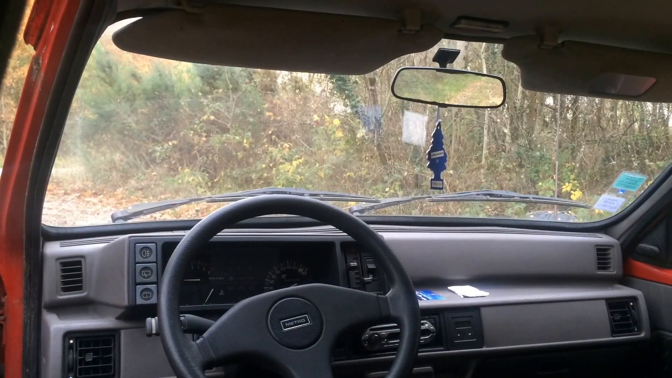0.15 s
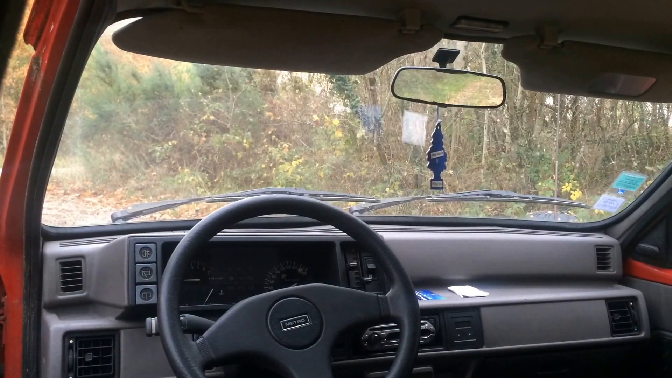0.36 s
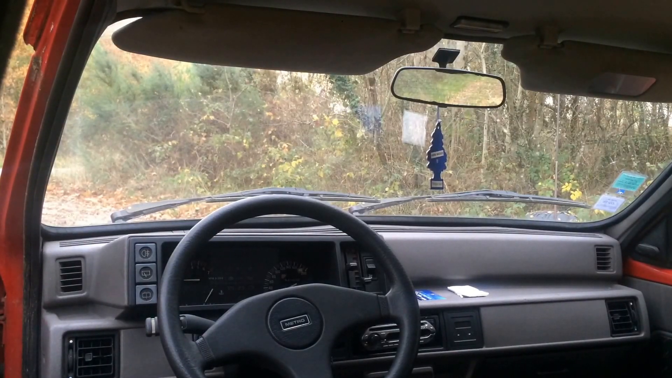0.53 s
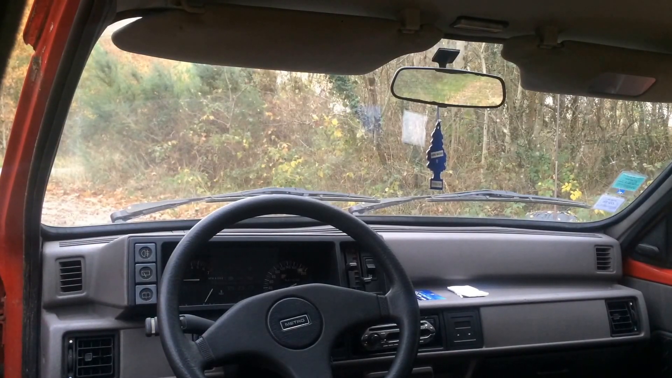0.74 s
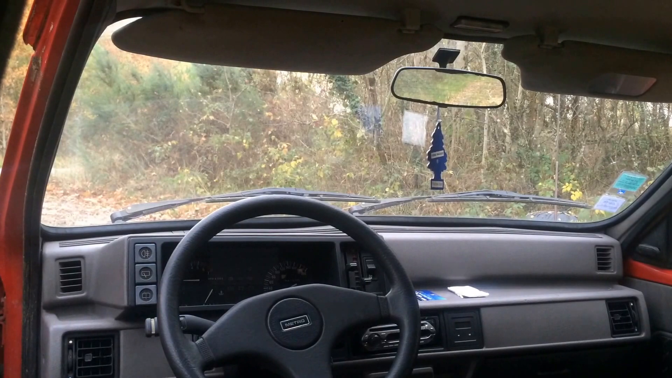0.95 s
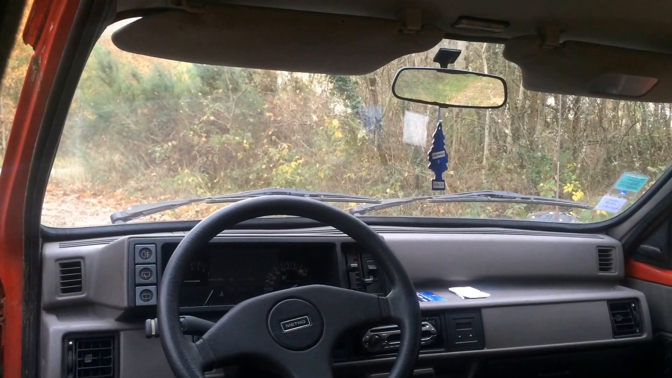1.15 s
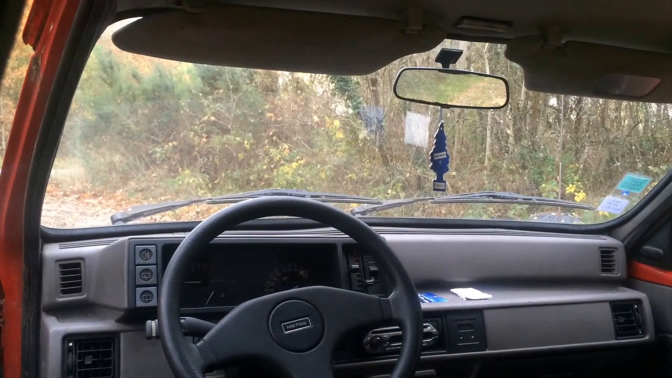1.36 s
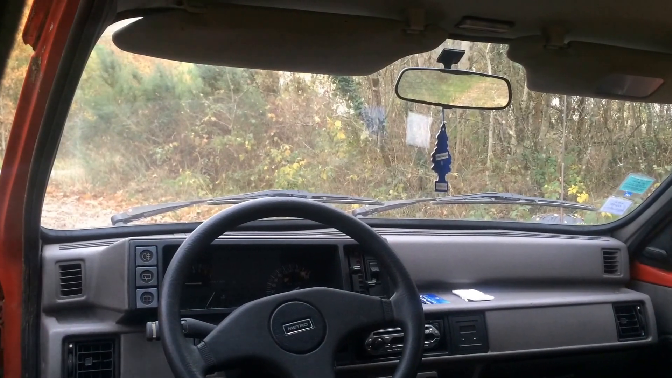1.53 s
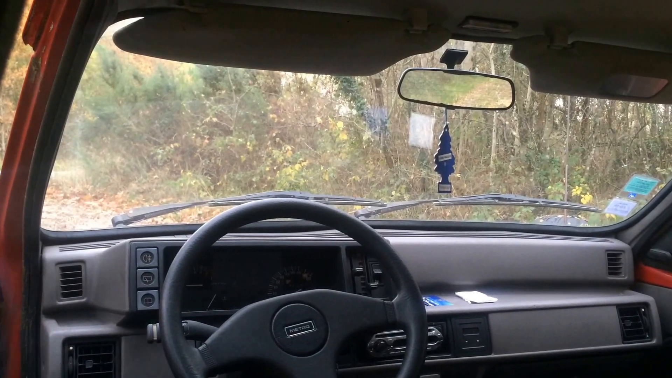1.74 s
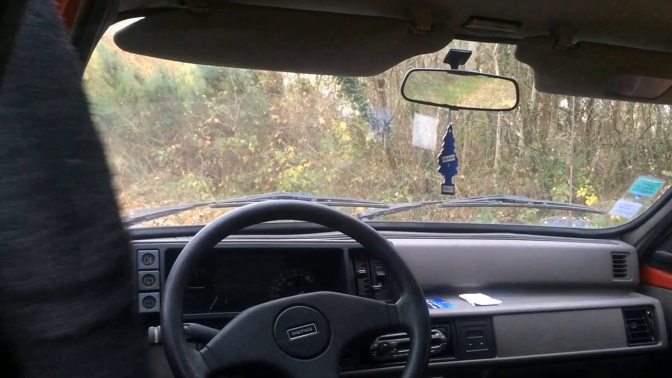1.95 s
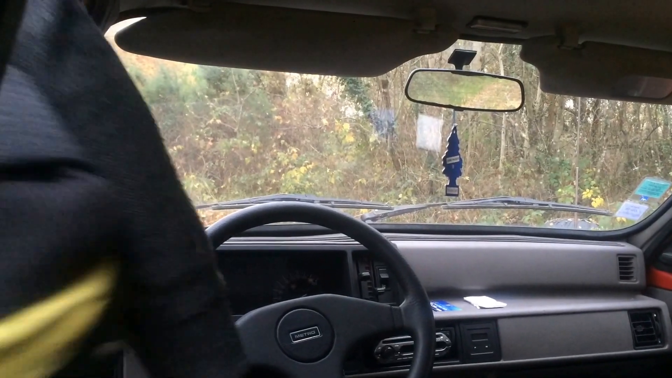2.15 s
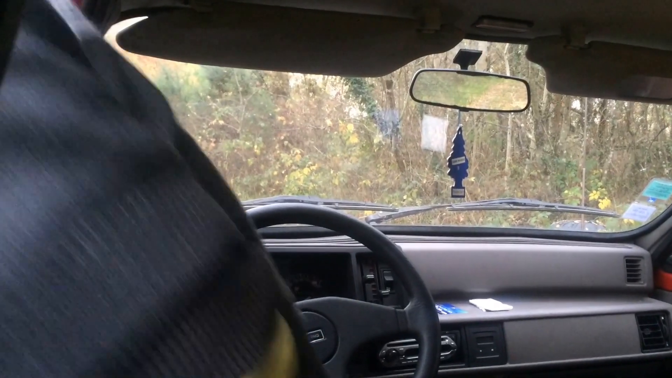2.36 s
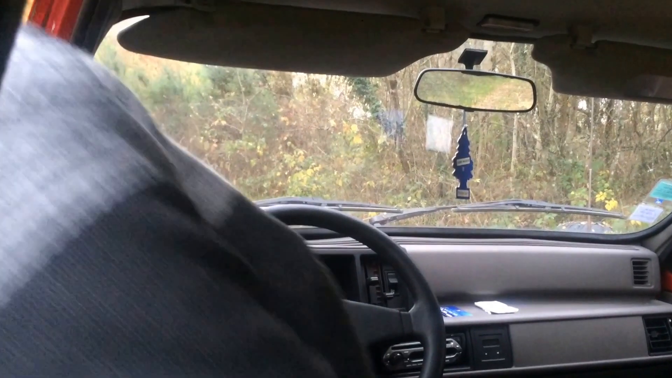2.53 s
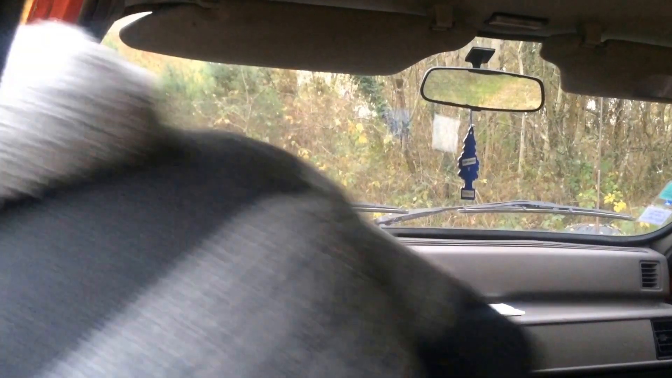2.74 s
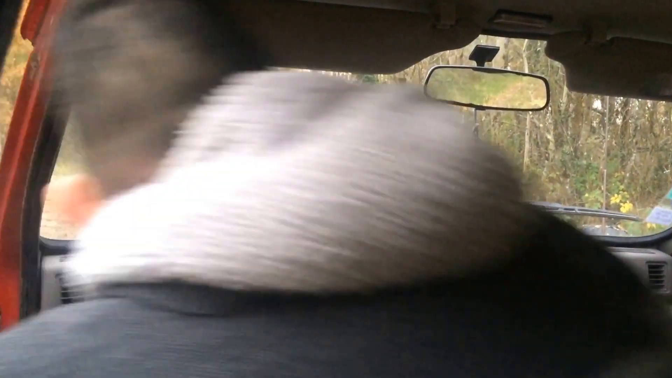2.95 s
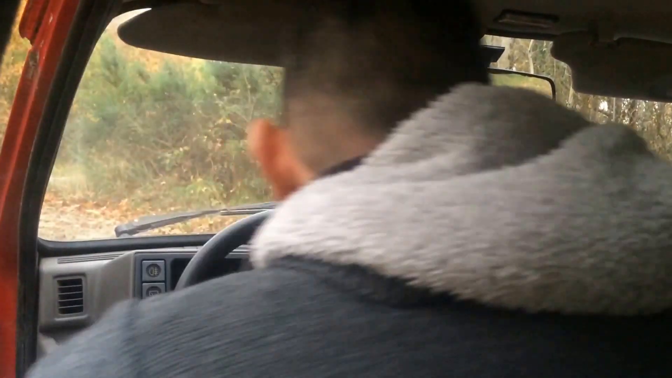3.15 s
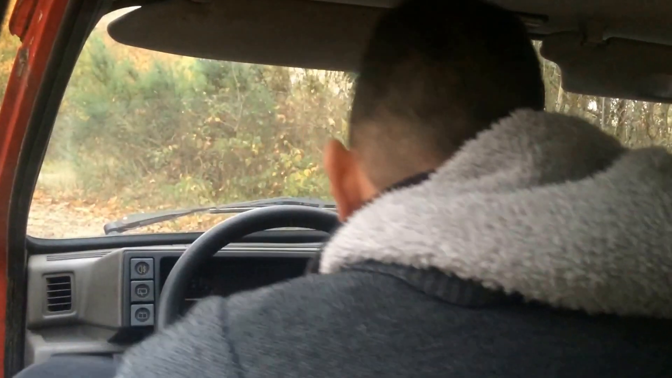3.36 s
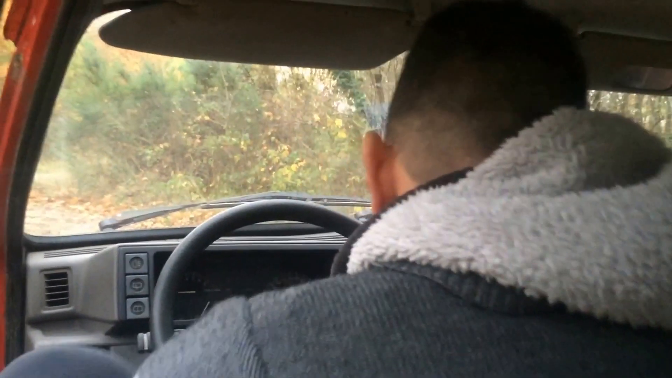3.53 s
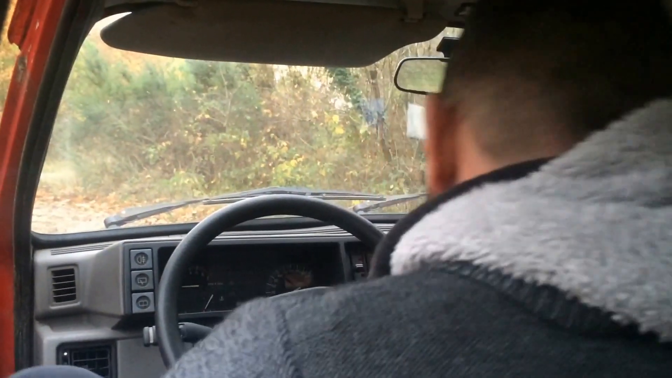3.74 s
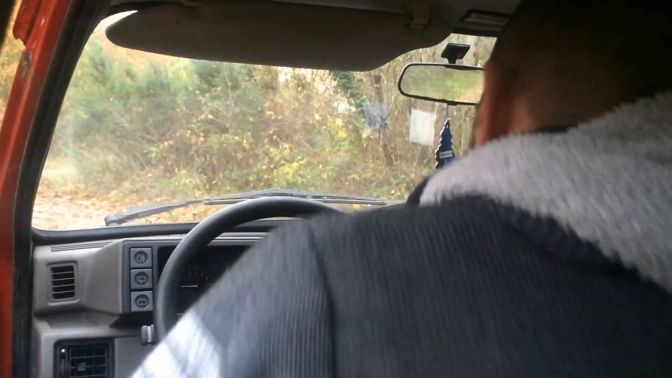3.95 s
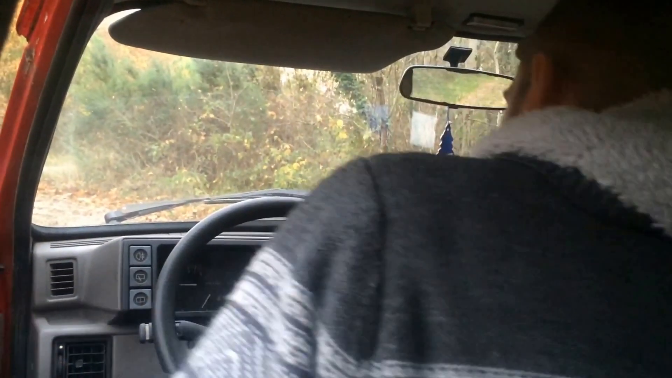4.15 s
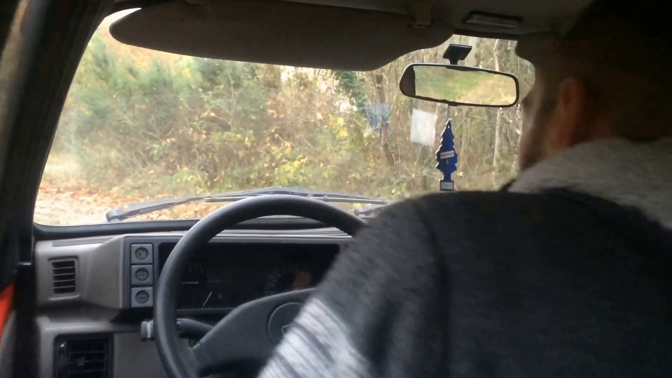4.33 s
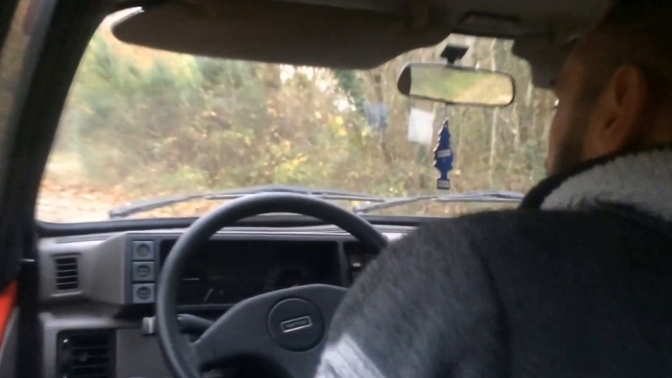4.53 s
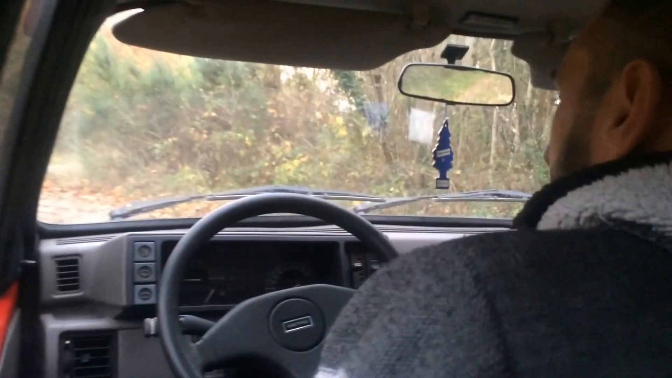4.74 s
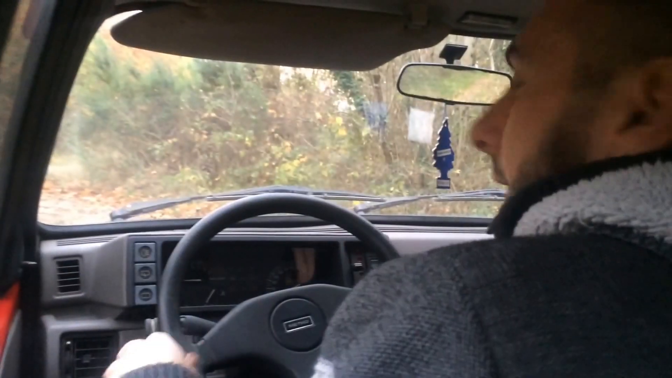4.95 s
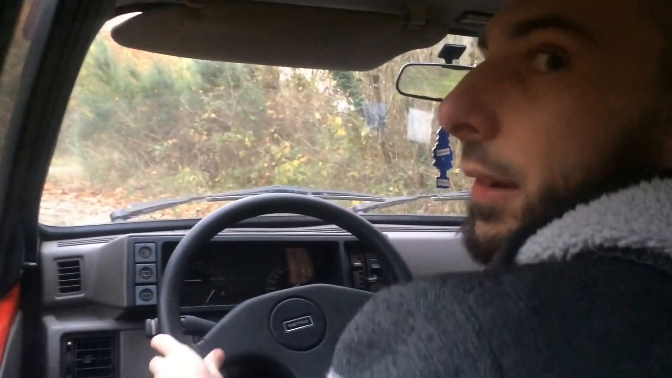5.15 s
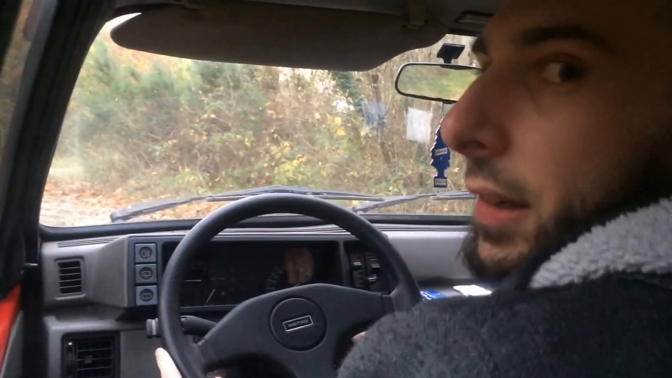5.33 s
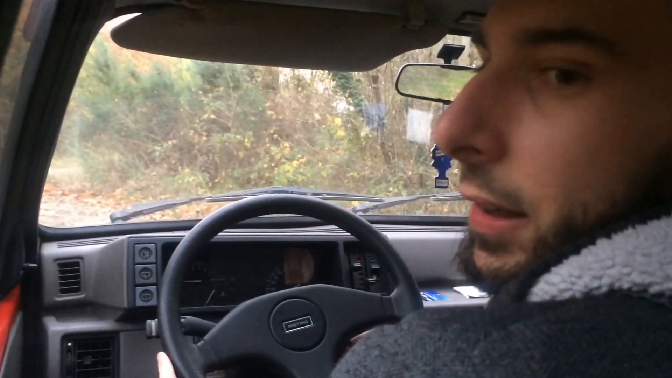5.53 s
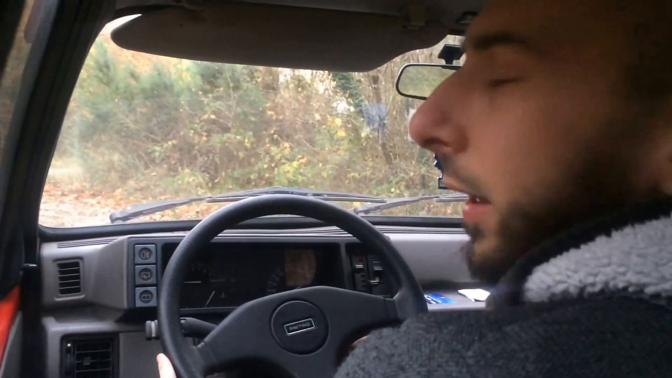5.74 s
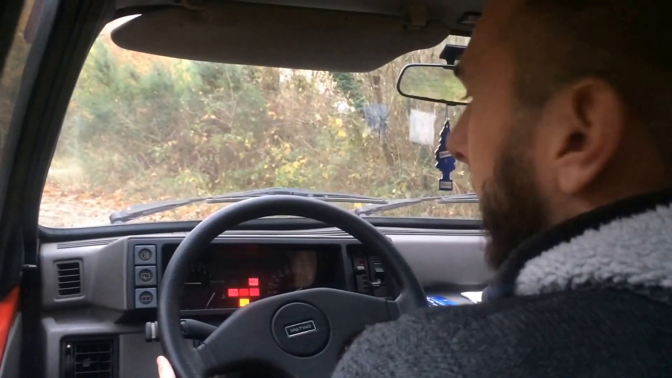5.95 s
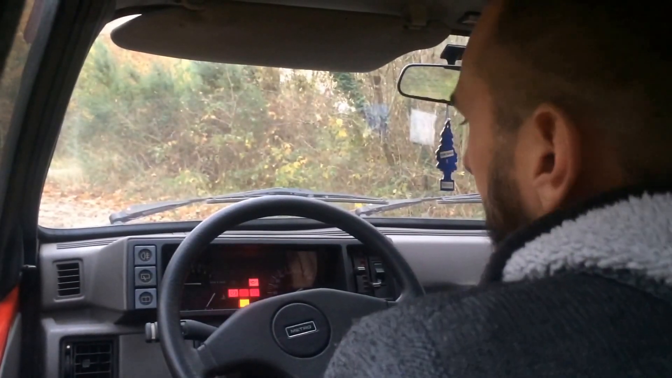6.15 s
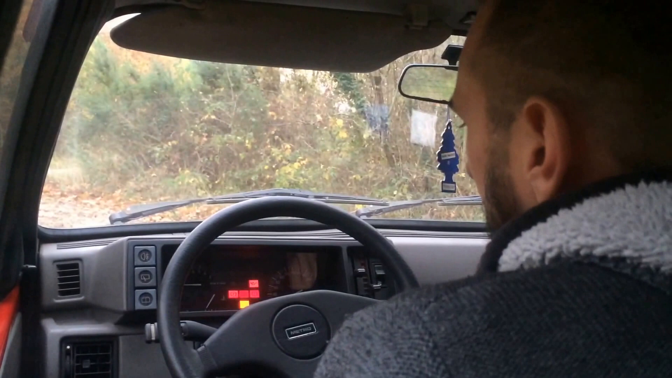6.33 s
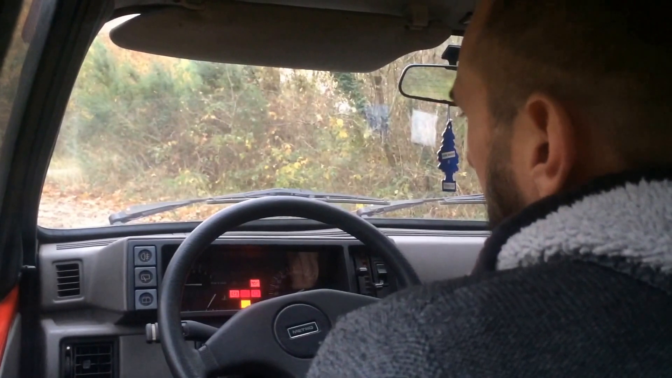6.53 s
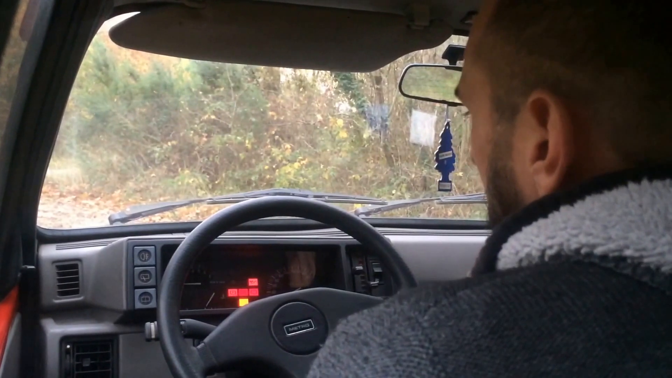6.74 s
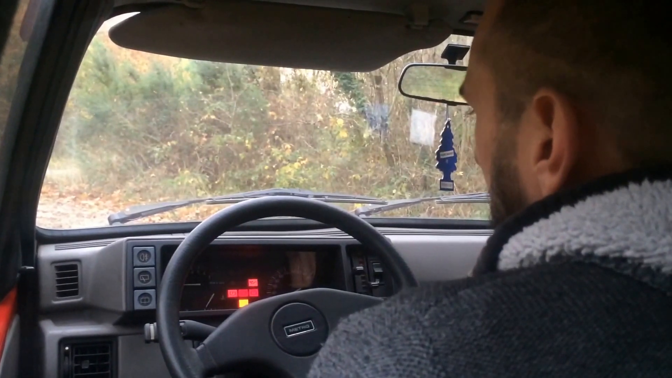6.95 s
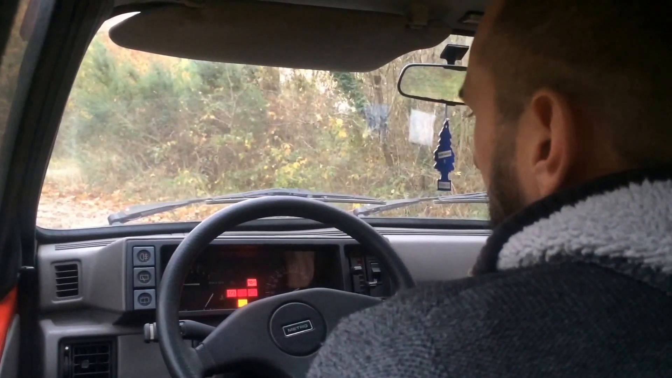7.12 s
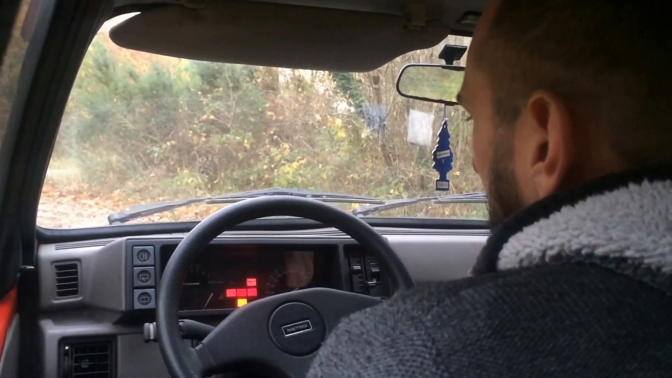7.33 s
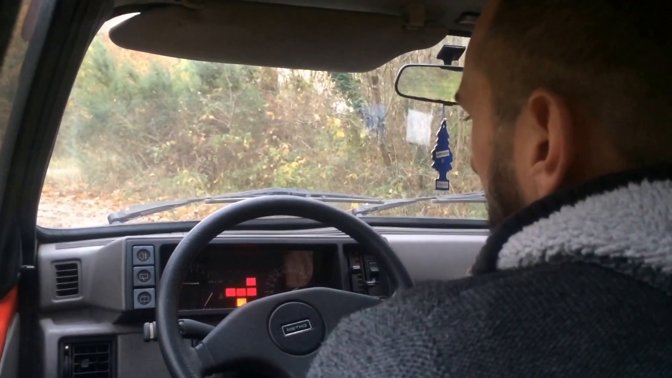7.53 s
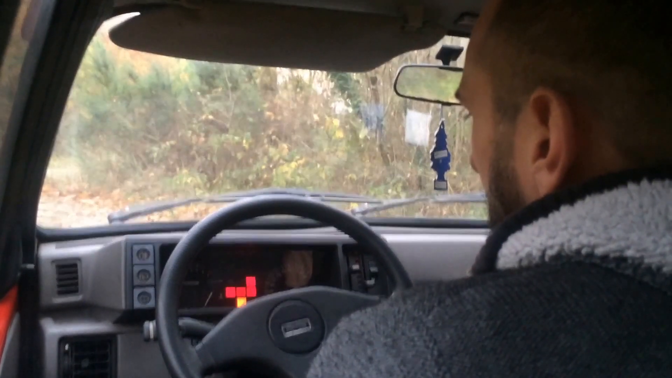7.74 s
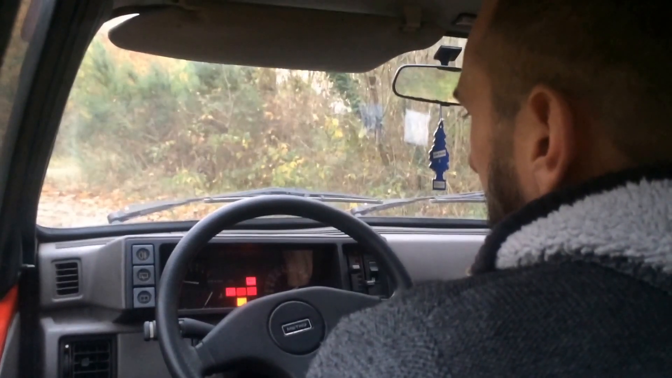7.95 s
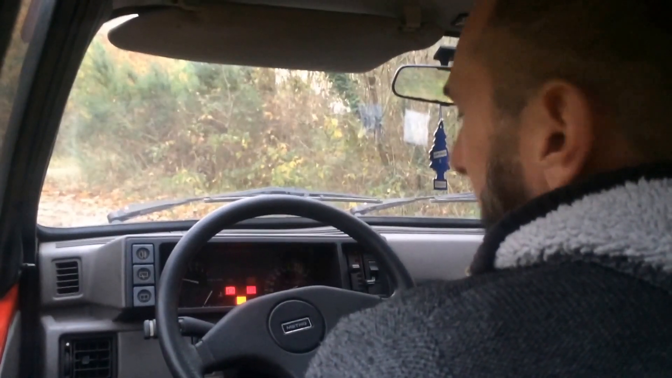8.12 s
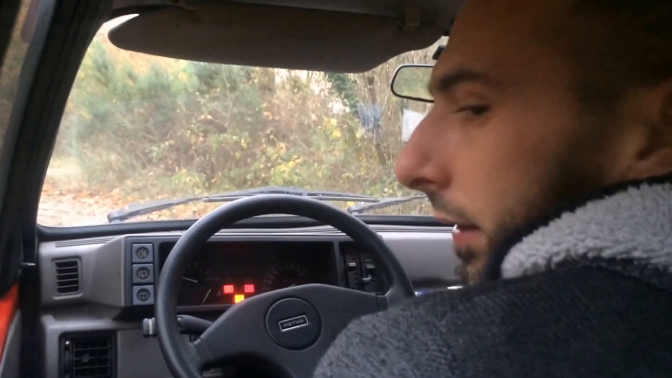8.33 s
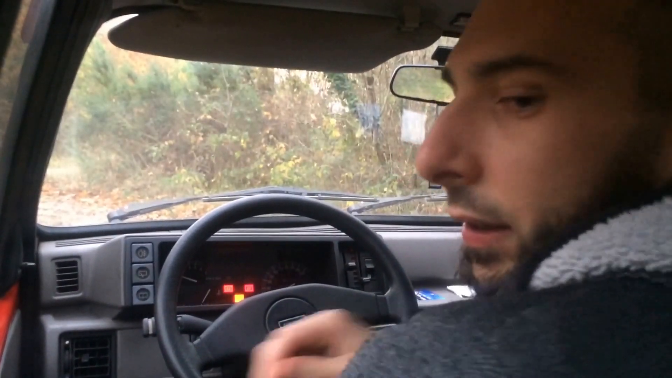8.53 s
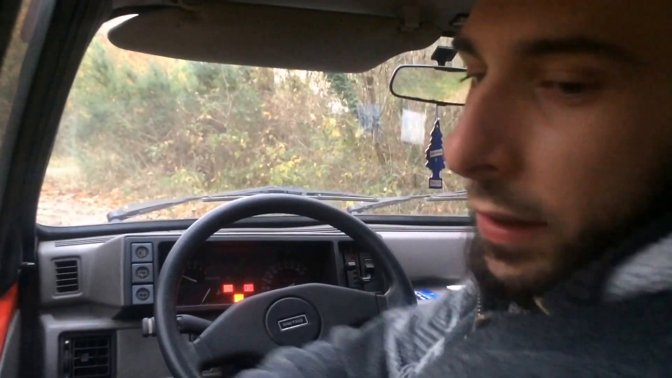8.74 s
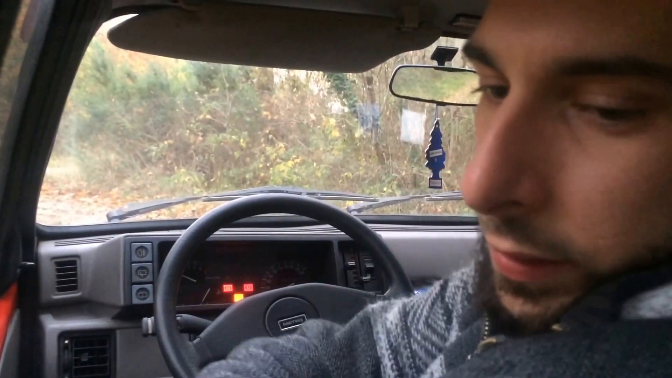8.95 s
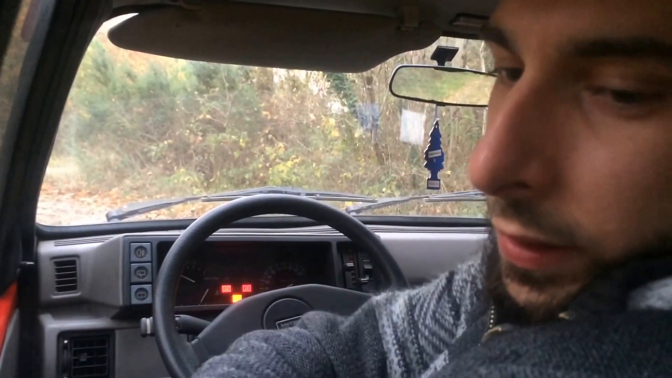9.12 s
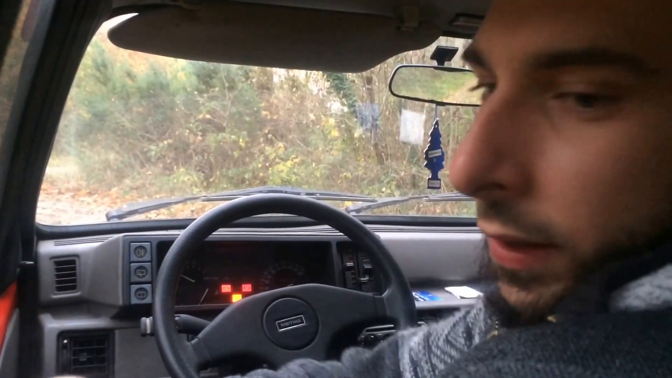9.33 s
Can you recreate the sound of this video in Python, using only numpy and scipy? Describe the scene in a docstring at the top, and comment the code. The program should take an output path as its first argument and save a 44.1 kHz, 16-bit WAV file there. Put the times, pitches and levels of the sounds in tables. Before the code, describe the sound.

Close inside a small old car parked by woodland. Faint hush and cloth rustle, then a dull thump as someone climbs in, seat creaks, another heavy thump, and a very loud door slam with a rattling tail. Small key and lever clicks and clunks follow. A brief starter grind turns into a falling whine as the four-cylinder engine catches, rumbling and rising in pitch.

```python
"""A small car heard from inside: someone climbs in, the seat thumps, the door slams and rattles, the engine starts.
Blows are short low notes that set body panels ringing; keys, latches and levers are bursts of tiny impacts.
The starter grinds and its whine runs down in pitch; the four-cylinder engine catches and climbs in pitch,
built from waves locked to its firing rate plus clatter, rumble and hiss.
Shaped noise makes the cloth rustle, the body sway, the seat creak and the quiet outdoor hush."""
import sys
import numpy as np
from scipy import signal
from scipy.fft import rfft, irfft
from scipy.io import wavfile
from scipy.ndimage import uniform_filter1d

SR = 44100
rng = np.random.default_rng(int(sys.argv[2]) if len(sys.argv) > 2 else 0)


def put_to_file(sound):
    """Save the sound as 16-bit audio at rate SR, in the file named by the first command-line argument."""
    columns = np.atleast_2d(sound).T  # one column per channel
    safe = np.clip(columns, -1, 1)
    whole_steps = np.round(safe * 32767)
    wavfile.write(sys.argv[1], SR, whole_steps.astype(np.int16))


N = 413658
TIME = np.arange(N) / SR


def undb(db):
    """Turn decibels into a plain multiplier."""
    return 10 ** (np.asarray(db) / 20)


def unit(x):
    """Scale to an average (RMS) level of 1."""
    return x / np.sqrt(np.mean(x ** 2))


def curves(table):
    """Draw each column over time; also return a gate that fades to zero 20 ms outside the table."""
    s, *columns = np.transpose(table)
    gate = np.clip(np.minimum(TIME - s[0] + .02, s[-1] + .02 - TIME) / .02, 0, 1)
    return [np.interp(TIME, s, column) for column in columns], gate


def walk(rate):
    """Wander at random: levels held for 1 / rate seconds, smoothed twice, with a spread near 1."""
    held = int(SR / rate)
    steps = np.repeat(rng.standard_normal(N // held + 1), held)
    return 1.3 * uniform_filter1d(uniform_filter1d(steps, held), held)[:N]


def coloured(spectrum, flicker_db=0., rate=10.):
    """Make noise with the given (hz, db) spectrum; each octave flickers on its own."""
    hz = np.maximum(np.arange(N // 2 + 1) * SR / N, 1)
    f, db = np.transpose(spectrum)
    shape_db = np.interp(np.log(hz), np.log(f), db, left=-90, right=-90)
    full = rfft(rng.standard_normal(N)) * undb(shape_db)
    octave = np.floor(np.log2(hz / 30)).clip(0, 8)
    return unit(sum(irfft(full * (octave == k), N) * undb(flicker_db * walk(rate)) for k in range(9)))


def band(lo_hz, hi_hz):
    """Spectrum of a soft-edged band of noise."""
    return [(lo_hz / 2, -24), (lo_hz, 0), (hi_hz, -6), (2 * hi_hz, -30)]


def resonate(x, hz, width):
    """Let one resonance ring; a narrow width in Hz rings longer."""
    b, a = signal.iirpeak(hz, hz / width, SR)
    return signal.lfilter(b, a, x)


def body(x, peaks):
    """Ring all of an object's resonances, with alternating sign."""
    return sum((-1) ** k * undb(db) * resonate(x, f, w) for k, (f, w, db) in enumerate(peaks))


def add(out, s, x, db):
    """Place a short sound at s seconds, scaled to the given peak."""
    i = int(s * SR)
    out[i:i + len(x)] += (x * undb(db) / np.abs(x).max())[:N - i]


def decay(t, t60, rise):
    """Rise smoothly, then fade; t60 is the time to fade by 60 dB."""
    return (1 - np.exp(-t / rise)) * np.exp(-np.log(1000) * t / t60)


# colour of the outdoor hush: hz, level_db (per Hz)
HUSH_COLOUR = [(20, -22), (40, 0), (60, -16.5), (500, -27), (1000, -23.5), (2000, -39), (15500, -53)]
HUSH_DB = -67.5


def hush():
    """Steady quiet outdoor noise whose octaves drift slowly."""
    return undb(HUSH_DB) * coloured(HUSH_COLOUR, 1.1, 0.93)


# body sway and seat creak, including the low sway after the door slam: time_s, sway_db, creak_db
SWAY_AND_CREAK = [(0, -70.5, -67.5), (2.15, -69, -66), (2.5, -62, -66.5), (2.9, -43, -53),
                  (3.15, -52, -55.5), (3.4, -52, -53.5), (3.84, -59, -58), (4.1, -51, -53), (4.4, -62, -60),
                  (4.62, -37, -59.5), (4.9, -51.5, -60), (5.4, -56.5, -57), (5.75, -61, -67.5),
                  (5.91, -60.5, -55), (6.4, -59.5, -65.5), (6.78, -50, -50), (7.0, -55.5, -61.5),
                  (7.25, -60, -74), (7.5, -61.5, -71.5)]
# the steady stir under the rustles: time_s, level_db
STIR = [(0, -71.5), (4.4, -68), (4.6, -73.5), (6.9, -75), (7.6, -78), (9.38, -83)]
# cloth sliding and leaves stirring: start_s, held_s, level_db
RUSTLES = [(.05, 0.18, -62.5), (.8, 0.14, -69), (1.161, 0.049, -57), (1.28, 0.096, -60.5),
           (1.42, 0.063, -55.5), (2.36, 0.13, -58.5), (3.0, 0.18, -65.5), (3.34, .08, -63),
           (4.0, 0.19, -65), (4.78, 0.092, -69), (6.2, 0.16, -72)]
# colour of the rustling: hz, level_db (per Hz)
CLOTH_COLOUR = [(900, -6), (1800, -1.5), (2400, -2.5), (2700, 1), (3100, -2), (7000, -3.5), (11000, -7),
                (15500, -12.5)]
RUSTLE_ATTACK_S, RUSTLE_T60_S = .02, 0.26


def sway_creak_and_rustle():
    """The body shell sways as low noise, the seat creaks higher up, and cloth and leaves rustle in patches."""
    (sway_db, creak_db), gate = curves(SWAY_AND_CREAK)
    sway = undb(sway_db) * coloured(band(28, 200), 3.3, 5.1)
    creak_colour = [(150, -19.5), (300, 1.0), (600, -5.0), (1300, -16), (2600, -31.5)]
    creak = undb(creak_db + 1.9 * walk(70)) * coloured(creak_colour, 2.6, 35.0)
    power = undb(curves(STIR)[0][0]) ** 2
    for s, held, db in RUSTLES:
        attack = np.clip((TIME - s) / RUSTLE_ATTACK_S + 1, 0, 1)  # fully up at start_s
        release = undb(-60 * np.clip(TIME - s - held, 0, None) / RUSTLE_T60_S)
        power = power + (undb(db) * attack * release) ** 2
    rustle = np.sqrt(power) * undb(1.8 * walk(54)) * coloured(CLOTH_COLOUR, 1.0, 34.0)
    return gate * (sway + creak) + rustle


# latches, keys, levers, trim: time_s, knock_db (peak), tick_db (drive into the metal),
# contact_s, hardness_db_per_octave
CLICKS = [(0.2, -49.5, -46, 0.039, 7.5), (0.962, -54.5, -53, 0.028, 12), (1.332, -55, -51, 0.02, 12),
          (1.408, -45.5, -50.5, 0.012, 12), (2.293, -22, -41, 0.02, 1.5), (2.419, -40, -52, 0.052, 0.5),
          (2.699, -47.5, -57, 0.024, 7), (2.946, -36, -61, 0.029, 1.5), (3.04, -41, -64, 0.089, 0.5),
          (3.099, -39.5, -66, 0.016, 4), (3.324, -30.5, -72, 0.03, -5), (3.403, -45, -53, 0.022, 10),
          (3.451, -33, -68, 0.025, -4), (3.5, -38, -64, 0.026, 2.5), (3.531, -22, -44, 0.034, -0.5),
          (3.55, -25.5, -48, 0.04, -20), (4.043, -37.5, -71, 0.021, -8), (4.15, -40, -64, 0.038, -2.5),
          (4.388, -30.5, -46, 0.032, -1), (4.414, -7, -6.5, 0.013, 5.5), (4.427, -2.5, -6.5, 0.014, -4.5),
          (4.454, -3.5, -11.5, 0.031, 1), (4.478, -13.5, -31.5, 0.052, -11), (4.51, -23, -27, 0.029, 2),
          (4.539, -16.5, -30.5, 0.024, -2.5), (4.555, -18, -31.5, 0.025, -3), (4.573, -26, -37, 0.021, -15),
          (4.591, -24, -41.5, 0.023, -1), (4.756, -56, -55.5, 0.048, 6.5), (5.124, -45.5, -57, 0.042, 0),
          (5.282, -48, -80, 0.029, 1.5), (5.405, -49.5, -52.5, 0.03, 4.5), (5.532, -43.5, -62, 0.036, 1),
          (5.737, -38.5, -54.5, 0.068, -2), (5.765, -42, -57.5, 0.019, 0), (5.835, -26.5, -34, 0.033, 1.5),
          (5.844, -20, -26, 0.031, -1), (5.91, -26.5, -32.5, 0.027, 0), (5.927, -23, -67.5, 0.021, -4),
          (6.32, -47.5, -60.5, 0.077, 1.5), (6.565, -27.5, -55.5, 0.047, -6),
          (6.587, -23.5, -51, 0.032, -8), (6.75, -44, -61, 0.021, -1), (6.813, -28, -40, 0.02, 0.5),
          (6.871, -23, -66, 0.034, -2.5), (6.882, -26.5, -52, 0.043, -11),
          (7.209, -42.5, -62.5, 0.023, 0.5), (7.426, -35, -36.5, 0.039, -1.5), (7.455, -18, -50, 0.036, -2),
          (7.466, -22.5, -46, 0.026, -6.5), (7.491, -20.5, -59, 0.04, -10), (7.721, -29, -80, 0.015, -2.5),
          (7.779, -27.5, -50.5, 0.029, 0), (7.82, -37, -51, .02, 2), (7.849, -32, -51.5, 0.048, 2),
          (8.027, -18, -39.5, 0.025, -3.5), (8.14, -43, -56, 0.017, -0.5), (8.291, -29, -59, 0.011, 4.5),
          (9.158, -34, -53, 0.01, -16)]
# resonances of the trim, before hardness tilts them: hz, width_hz, level_db
TRIM = [(320, 130, 3.5), (490, 150, 7), (680, 140, 6.5), (860, 250, 3.5), (1200, 620, -1.5),
        (1650, 370, -1), (2270, 1400, -8)]
# resonances of the metal parts, before loudness tilts them: hz, width_hz, level_db
LATCH = [(2640, 700, 0), (3040, 990, 2), (4350, 350, 6.5), (5120, 840, 1), (6790, 1900, 0),
         (9150, 1200, -0.5), (12000, 4900, -9)]
FIRST_TOUCH_S = .002  # a click begins this long before its listed time
LOUD_DULL = .1  # louder ticks sound duller: dB per octave lost per dB


def clicks(rise_share=0.081, grit_db=3.0, tick_share=0.62, padding_hz=1900):
    """A burst of tiny impacts rings the trim, the harder the brighter; the metal tick on top stops sooner."""
    out, t = np.zeros(N), TIME[:SR // 5]
    padding = signal.butter(2, padding_hz, fs=SR, output="sos")
    for s, knock_db, tick_db, contact, hard in CLICKS:
        s = s - FIRST_TOUCH_S
        noise, grit = rng.standard_normal((2, len(t)))
        hits = noise * undb(grit_db * uniform_filter1d(grit, size=40) * np.sqrt(40))
        hits = hits * (1 - np.exp(-t / (rise_share * contact)))
        dulling = LOUD_DULL * (max(tick_db, -35) + 20.5)  # below zero it brightens
        struck_trim = [(f, w, db + hard * np.log2(f / 800)) for f, w, db in TRIM]
        struck_metal = [(f, w, db - dulling * np.log2(f / 5000)) for f, w, db in LATCH]
        # the parts chatter for about the contact time, then seat and fall silent
        knock = body(hits * np.exp(-(t / contact) ** 2), struck_trim)
        add(out, s, signal.sosfilt(padding, knock), knock_db)
        tick = undb(tick_db) * body(hits * np.exp(-(t / (tick_share * contact)) ** 2), struck_metal)
        i = int(s * SR)
        out[i:i + len(t)] += tick[:N - i]
    return out


def cabin(x, t60=0.13, wet_db=-17.5):
    """Glass and upholstery send back a short, padded tail of echoes."""
    t = TIME[:SR // 4]
    dull_noise = signal.lfilter([1], [1, -.6], rng.standard_normal(len(t)))
    tail = dull_noise * decay(t, t60, 0.0022)
    return x + undb(wet_db) * signal.fftconvolve(x, tail / np.sqrt(np.sum(tail ** 2)))[:N]


# faint hums: pitch_hz, level_db (peak, before it wavers), start_s, stop_s
HUMS = [(181, -57.5, 6.6, 7.45), (224, -59, 6.6, 8.3), (119, -68.5, 0.8, 2.1)]


def hums():
    """Faint steady pitches whose loudness wavers."""
    out = 0
    for hz, db, start, stop in HUMS:
        fade = np.clip(np.minimum(TIME - start, stop - TIME) / 0.09, 0, 1)
        out = out + fade * undb(db + 2.5 * walk(8)) * np.sin(2 * np.pi * hz * TIME)
    return out


# blows on seat, floor and door: time_s (of the peak), peak_db, pitch_hz
THUMPS = [(0.868, -52, 257), (1.769, -50, 123), (2.308, -12.5, 143), (2.323, -16, 143), (2.38, -29.5, 111),
          (2.422, -22.5, 136), (2.46, -31.5, 56.7), (2.753, -37.5, 150), (2.812, -35, 54),
          (2.952, -35.5, 272), (3.028, -30, 50.5), (3.334, -33.5, 150), (3.359, -32, 51), (3.46, -36, 135),
          (3.536, -6.5, 135.5), (3.571, -22, 142), (3.611, -24, 141), (3.644, -34, 143), (3.781, -38, 83),
          (4.045, -32, 86), (4.07, -33, 115), (4.141, -28.5, 125), (4.18, -25, 126), (4.418, -11, 143),
          (4.437, -7, 77.4), (4.465, -5.5, 122), (4.487, -5.5, 193), (4.5, -8, 67), (4.515, -12, 101),
          (4.54, -15, 179), (4.578, -21, 56.7), (4.609, -22.5, 119), (4.871, -41.5, 248), (5.41, -40, 153),
          (5.75, -38.5, 259), (5.845, -29, 275), (5.892, -39.5, 253), (5.965, -38, 129), (6.269, -45, 54.4),
          (6.326, -36.5, 182), (6.567, -31.5, 250), (6.597, -23, 277), (6.613, -17.5, 127),
          (6.634, -25.5, 257), (6.703, -36, 75), (6.896, -11, 200), (6.916, -17, 217), (6.947, -26.5, 114),
          (7.006, -37, 100), (7.231, -45, 205.5)]
# hollow parts that answer with one short note: time_s (of the peak), peak_db, pitch_hz, push_s
PINGS = [(5.287, -35.5, 657, 0.0077), (5.329, -48.5, 637, 0.0038), (5.745, -34.5, 661, 0.0081),
         (5.852, -22.5, 1183, 0.0049), (5.918, -27.5, 1200, 0.0038), (6.368, -51, 620, 0.0064),
         (7.466, -33, 1650, 0.0055), (7.466, -32, 2870, 0.0028), (7.498, -28, 281, 0.0054),
         (7.557, -24.5, 288, 0.0078), (7.598, -29, 174, 0.026), (7.722, -38, 840, 0.013),
         (8.031, -29, 1000, 0.0075), (8.301, -30.5, 657, 0.0055)]
# resonances of the body panels: hz, width_hz, level_db
PANELS = [(42, 22, -6.5), (60, 14, 2), (93.5, 18, 0), (134, 15, -1.5), (149, 6.2, 1), (207, 5.7, -4.5),
          (275, 160, -7)]
PUSH_S = 0.0057  # time from first touch to the peak of a blow
# the shell's shaking after a blow, its level against the blow
SHUDDER_DB, SHUDDER_T60_S, SHUDDER_RISE_S = -19.5, .65, .04


def thumps(ring_db=-5.5):
    """Each blow swells and dies as a short note; the body panels ring on and the shell shudders after it."""
    blows = np.zeros(N)
    for s, db, hz, push in [row + (PUSH_S,) for row in THUMPS] + PINGS:
        x = TIME[:SR // 5] / push  # 1 at the peak
        note = (x * np.exp(-x)) ** 1.7 * np.cos(2 * np.pi * hz * push * (x - 1))
        add(blows, s - push, note, db)
    # the power of the blows, spread over time, drives the shudder
    tail = decay(TIME[:SR], SHUDDER_T60_S, SHUDDER_RISE_S) ** 2 / (PUSH_S * SR)
    shaking = np.sqrt(np.abs(signal.fftconvolve(blows ** 2, tail)[:N]))
    shudder = undb(SHUDDER_DB) * shaking * coloured(band(36, 130), 1.5, 18.0)
    return blows + undb(ring_db) * body(blows, PANELS) + shudder


# cranking: time_s, thud_db, grind_db
CRANK = [(7.46, -38.5, -80), (7.494, -32.5, -55.5), (7.56, -33.5, -43), (7.65, -36.5, -43),
         (7.712, -38.5, -37), (7.776, -28, -41), (7.85, -32.5, -37)]
# resonances of the starter casing: hz, width_hz, level_db
CASING = [(290, 77, -5.5), (475, 78, 0.5), (840, 90, -10.5), (1000, 40, -7), (1350, 240, -19.5),
          (2530, 380, -25)]
# pitch while engaged, pitch it sinks towards, time constant of the run-down
WHINE_HZ, WHINE_END_HZ, WHINE_SAG_S = 494, 333, 0.3
WHINE_FROM_S, PINION_FREE_S, WHINE_TO_S = 7.94, 8.085, 8.62
WHINE_DB, WHINE_FADE_DB_PER_S = -32.5, 41.5  # before the housing lifts it; fades once the pinion is free
# resonance that the whine passes and the motor shakes
HOUSING_HZ, HOUSING_WIDTH_HZ, HOUSING_LIFT_DB, HOUSING_RING_DB = 383, 23.5, 15.5, -46


def starter():
    """The pinion grinds the ring gear; the motor's whine runs down through a resonance of its housing."""
    (thud_db, grind_db), turning = curves(CRANK)
    thud = undb(thud_db) * coloured(band(50, 170), 2.0, 20.0)
    scraping = rng.standard_normal(N) * undb(2.0 * walk(40))
    grind = undb(grind_db) * unit(resonate(body(scraping, CASING), 700, 2200))

    free_s = np.clip(TIME - PINION_FREE_S, 0, None)
    hz = WHINE_END_HZ + (WHINE_HZ - WHINE_END_HZ) * np.exp(-free_s / WHINE_SAG_S)
    lift_db = HOUSING_LIFT_DB / (1 + (2 * (hz - HOUSING_HZ) / HOUSING_WIDTH_HZ) ** 2)
    db = WHINE_DB - WHINE_FADE_DB_PER_S * free_s + lift_db
    phase = 2 * np.pi * np.cumsum(hz * (1 + 0.00292 * walk(30))) / SR
    whine = np.sqrt(2) * undb(db + 2.8 * walk(22)) * np.sin(phase)
    ring = undb(HOUSING_RING_DB) * unit(resonate(rng.standard_normal(N), HOUSING_HZ, HOUSING_WIDTH_HZ))
    fade = np.clip(np.minimum(TIME - WHINE_FROM_S, WHINE_TO_S - TIME) / 0.024, 0, 1)
    return fade * (whine + ring) + turning * (thud + grind)


# firing rate, before it wavers: time_s, firing_hz
SPEED = [(7.75, 29.8), (7.836, 32.7), (8.008, 36.5), (8.194, 45.2), (8.498, 50.0), (8.73, 50.9),
         (8.812, 52.6), (9.38, 57.3)]
# loudness of a firing order by its pitch: hz, level_db
BOOM = [(30, -32), (50, -44), (57, -30), (70, -27), (100, -29.5), (115, -33), (135, -28), (150, -46.5),
        (168, -37), (185, -25.5), (215, -27.5), (230, -40)]
# resonances of the engine block: hz, width_hz, level_db
BLOCK = [(364, 66, 1.5), (480, 197, -4.5), (647, 120, -6.5), (840, 38, -10), (1000, 37, -10.5),
         (1330, 350, -21.5), (1650, 96, -23), (2510, 240, -32.5)]
# loudness of the engine's hiss: time_s, level_db
AIR = [(7.75, -59), (7.87, -62.5), (8.1, -68), (8.6, -66.5), (8.8, -60), (8.95, -66), (9.2, -61),
       (9.38, -57.5)]
# colour of the hiss: hz, level_db (per Hz)
HISS_COLOUR = [(1180, -18), (2000, -0.5), (2520, -2), (4550, -10), (5360, -8.5), (11700, -12), (15500, -24)]
CATCH_S, CATCH_RISE_S, SETTLE_S = 7.75, 0.055, 0.51  # first firing, swell, time constant of calming down
RUMBLE_CATCH_DB, RUMBLE_SETTLED_DB = -22, -30.5
BLOCK_CATCH_DB, BLOCK_SETTLED_DB = -29, -43.5


def engine(wobble=0.0055, scatter_db=2.0, half_db=-11.5, uneven_db=1.5, sharp=0.5):
    """Firing orders waver with uneven combustion, unequal cylinders add half orders, the block clatters."""
    (hz,), _ = curves(SPEED)
    since = np.clip(TIME - CATCH_S, 0, None)
    rough = np.exp(-since / SETTLE_S)  # 1 at the catch, 0 when settled
    phase = 2 * np.pi * np.cumsum(hz * (1 + wobble * walk(25))) / SR

    # the clatter swells once a firing
    clatter = rng.standard_normal(N) * np.exp(sharp * np.cos(phase) / 2) * undb(uneven_db * walk(50))
    block = unit(body(body(clatter, [(434, 1440, 0)]), BLOCK))  # the bulkhead dulls it
    # a wide, dull layer of engine clatter around 940 Hz
    broad = unit(body(clatter * rng.choice([-1, 1], N), [(940, 390, 0)]))
    block_db = BLOCK_SETTLED_DB + (BLOCK_CATCH_DB - BLOCK_SETTLED_DB) * rough
    out = undb(block_db) * (block + undb(-22.5) * broad)

    out += undb(curves(AIR)[0][0] + 1.5 * walk(12)) * coloured(HISS_COLOUR, 0.78, 6.0)
    rumble_db = RUMBLE_SETTLED_DB + (RUMBLE_CATCH_DB - RUMBLE_SETTLED_DB) * rough
    out += undb(rumble_db) * coloured(band(56, 239), 0.93, 12.0)

    f, boom_db = np.transpose(BOOM)
    for k in range(1, 5):
        db = np.interp(np.log(k * hz), np.log(f), boom_db)
        full_start, half_start = rng.uniform(0, 2 * np.pi, 2)
        out += np.sqrt(2) * undb(db + scatter_db * walk(12)) * np.cos(k * phase + full_start)
        half_level = undb(db + half_db + scatter_db * walk(19.0))
        out += half_level * np.cos((k - .5) * phase + half_start)
    return out * (1 - np.exp(-(since / CATCH_RISE_S) ** 2))


def scene():
    """Add up all the sounds; only the clicks get the cabin's echo tail."""
    quiet = hush() + sway_creak_and_rustle() + hums()
    return (quiet + cabin(clicks()) + thumps() + starter() + engine())[None]


LOW_CUT_HZ, TOP_HZ = 30, 15500


def record(dry):
    """The microphone loses the deepest bass, rounds the loudest peaks and cuts the top."""
    dry = signal.sosfilt(signal.butter(2, LOW_CUT_HZ, 'high', fs=SR, output='sos'), dry)
    rounded = 1.3 * np.tanh(dry / 1.3)
    return signal.sosfilt(signal.ellip(12, .5, 110, TOP_HZ, fs=SR, output="sos"), rounded)


dry = scene()
out = record(dry)
put_to_file(out)
```